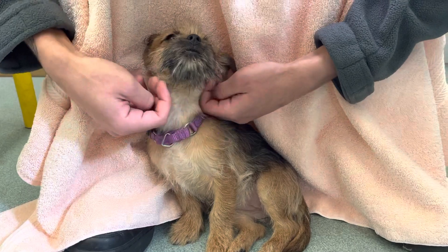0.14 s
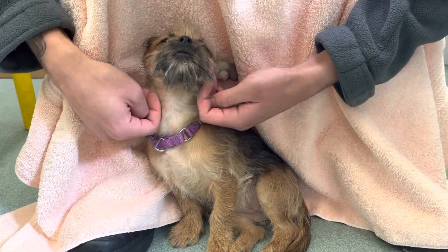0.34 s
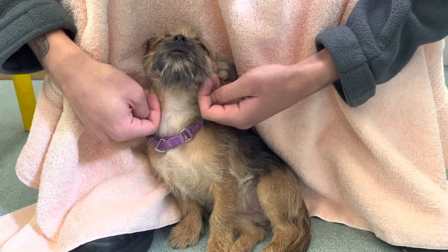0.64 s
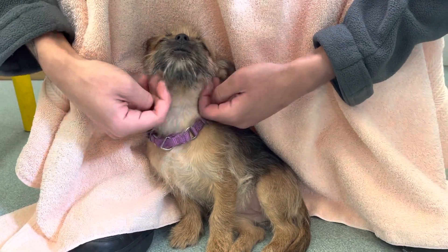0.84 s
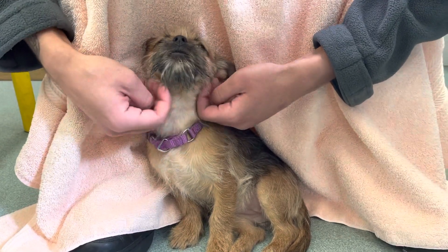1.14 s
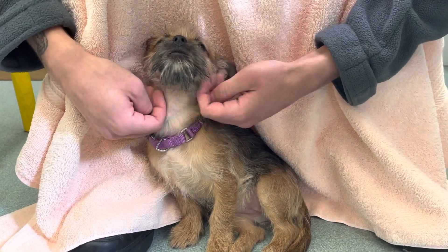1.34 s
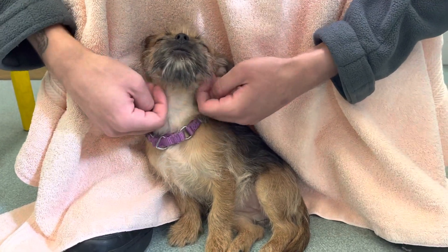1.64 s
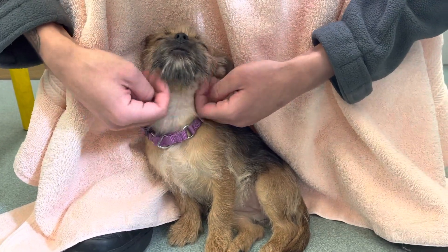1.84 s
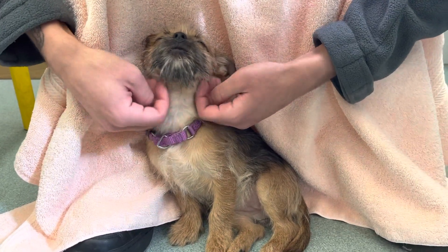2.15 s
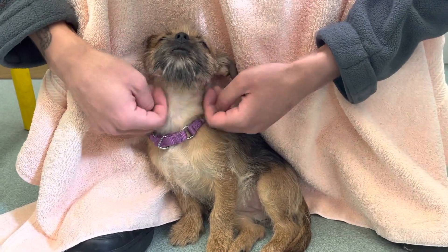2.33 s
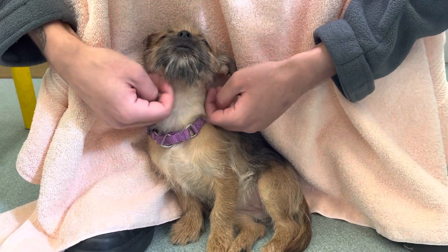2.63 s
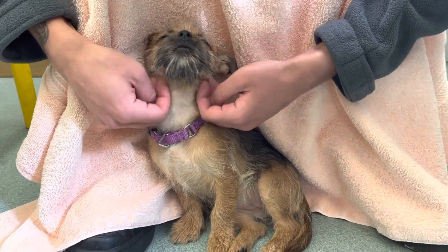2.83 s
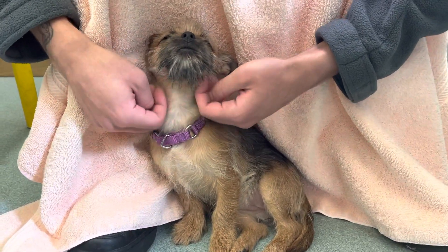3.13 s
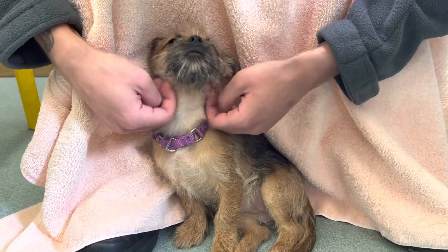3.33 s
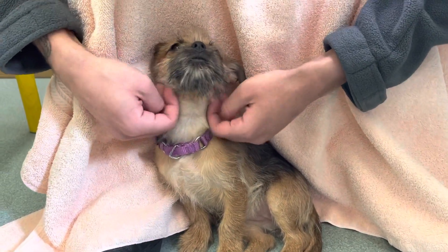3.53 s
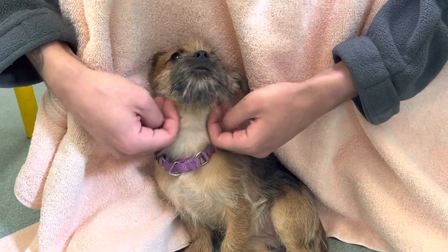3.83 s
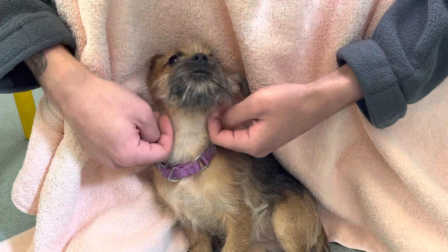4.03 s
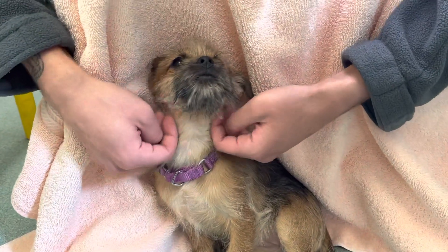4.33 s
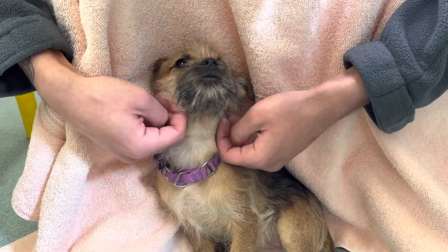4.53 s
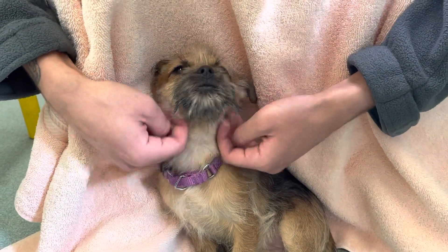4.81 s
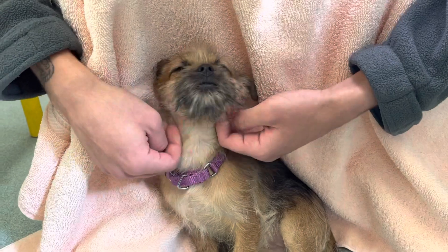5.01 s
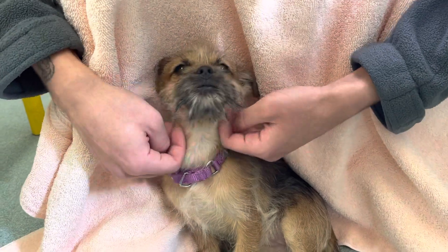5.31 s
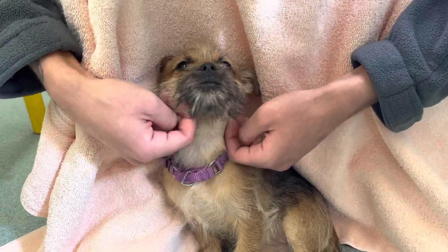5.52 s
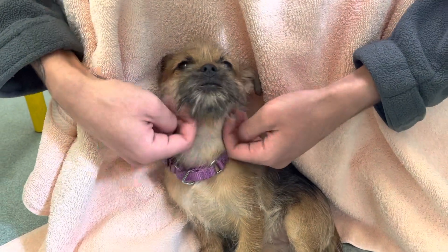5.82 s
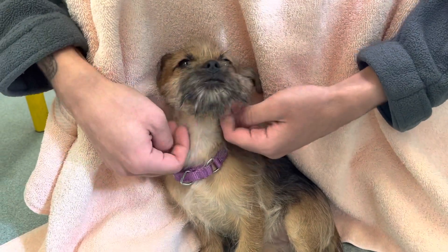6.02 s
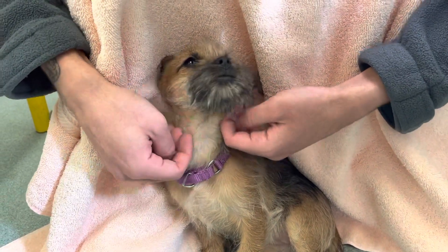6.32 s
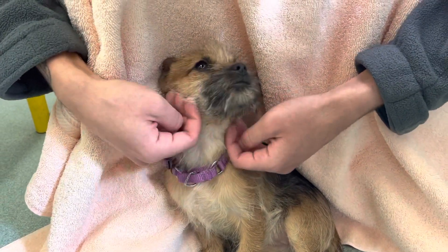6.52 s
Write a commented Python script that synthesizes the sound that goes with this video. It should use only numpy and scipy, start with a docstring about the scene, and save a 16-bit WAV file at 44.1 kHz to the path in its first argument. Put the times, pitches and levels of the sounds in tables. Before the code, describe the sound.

Indoors, a small puppy gives two short pitched yaps, the first already under way at the start. After a pause filled by a low fan hum and faint scratching of fingers in fur, a soft puff leads to three more yaps, then a pair. Small ticks sound between. The stereo microphones are close, with a short lively room echo.

```python
"""A small dog yaps seven times in three quick runs across a hard-walled room; the first yap has already begun.
Each yap sums vocal-fold partials, pulsed noise through resonances, and a whistle that modulates the partials.
A fan motor hums as wandering sine tones under the air noise, which is spectrally shaped random noise.
Close by, fingers scratch fur in swells of noise, among soft resonant puffs of air and small ringing ticks.
Two microphone ports listen: they differ in phase, balance and likeness by frequency."""
import sys
import numpy as np
from scipy import signal
from scipy.fft import rfft, irfft, next_fast_len
from scipy.io import wavfile
from scipy.ndimage import uniform_filter1d

SR = 44100
rng = np.random.default_rng(int(sys.argv[2]) if len(sys.argv) > 2 else 0)


def dump_mix(stems):
    """Bounce the given channels to the path in sys.argv[1] as a 16-bit WAV at rate SR."""
    frames = np.atleast_2d(stems).T  # one column per channel
    limited = np.clip(frames, -1, 1)  # hard clip at full scale
    pcm = np.round(limited * 32767).astype(np.int16)
    wavfile.write(sys.argv[1], SR, pcm)


N = 293697  # samples


def amp(db):
    """Logarithmic level: 20 dB is a factor of ten in amplitude."""
    return 10 ** (np.asarray(db) / 20)


def evened(x):
    """Power normalization: scales a signal to rms 1."""
    return x / np.sqrt(np.mean(x ** 2) + 1e-20)


def smoothed(x, size):
    """Low-pass filtering by two moving averages in a row."""
    return uniform_filter1d(uniform_filter1d(x, size=size), size=size)


def read(points, hz):
    """Logarithmic frequency scale: interpolates a table of (frequency, value)."""
    f, value = np.transpose(points)
    return np.interp(np.log(hz + 1), np.log(f + 1), value)


def add(mix, s, sound):
    """Superposition: adds a sound to the mix from a time in seconds."""
    part = mix[round(s * SR):][:len(sound)]
    part += sound[:len(part)]


def peak(t, at, rise, fall):
    """Exponential growth and decay: decibels climb linearly to 0 at a moment, then drop (rates in dB/s)."""
    return -np.maximum(rise * (at - t), fall * (t - at))


def resonate(x, hz, width):
    """Damped resonance: one complex pole, whose radius sets the bandwidth, with gain 1."""
    pole = np.exp((2j * np.pi * hz - np.pi * width) / SR)
    return 2 * signal.lfilter([1 - abs(pole)], [1, -pole], x).real


def ring(x, modes):
    """Modal superposition: parallel resonances, each passed twice for steep skirts and set to its level."""
    total = 0
    for hz, width, db in modes:
        twice = resonate(resonate(x, hz, width), hz, width)
        total = total + amp(db) * evened(twice)
    return total


def coloured(points, count):
    """Spectral shaping: independent white noises weighted by a spectrum, overall rms 1."""
    size = next_fast_len(N)
    weight = amp(read(points, np.fft.rfftfreq(size, 1 / SR)))
    spectrum = rfft(rng.standard_normal((count, size))) * weight
    return evened(irfft(spectrum, size)[:, :N])


# vocal-tract weighting of the third partial and above: pitch_hz [Hz], level_db [relative dB]
THROAT_SPECTRUM = [(2250, 4), (3000, -19.5), (3780, -16), (4500, -27.5), (6000, -14.5), (7480, -10),
                   (8680, -24), (9920, -42.5), (12000, -23), (14000, -49)]
# resonances rung by the rasp, low, high and treble: pitch_hz [Hz], width_hz [Hz], level_db [relative dB]
LOW_RASP_MODES = [(1125, 240, -1), (1305, 226, 4.5), (1344, 62, -15), (1400, 200, -26)]
HIGH_RASP_MODES = [(1993, 110, 13), (2576, 130, 5.5), (3210, 100, -10.5)]
TREBLE_RASP_MODES = [(3430, 200, -8.5), (5200, 2700, -5), (6760, 3900, -14), (8300, 940, -2.5),
                     (12900, 1000, -9.5)]
# resonances of the opening puff: pitch_hz [Hz], width_hz [Hz], level_db [relative dB]
OPENING_MODES = [(1700, 220, 3), (2100, 470, -12.5), (2630, 180, -8)]
# fundamental: climb before the folds catch, swell up to the crest, fade after it
CATCH_DB_PER_S, SWELL_DB_PER_S, FADE_DB_PER_S = 898.5, 104, 241
# second and upper partials, about the moment the mouth is widest
SECOND_RISE_DB_PER_S, SECOND_FALL_DB_PER_S = 80, 167.5
OPEN_DB_PER_S, SHUT_DB_PER_S = 320, 330
# the rasp peaks early, at RASP_S
RASP_S, RASP_RISE_DB_PER_S, LOW_FALL_DB_PER_S, HIGH_FALL_DB_PER_S = 0.035, 398, 108.5, 178.5
WHISTLE_HZ, WHISTLE_RISE_DB_PER_S, WHISTLE_FALL_DB_PER_S = 919.3, 452.5, 446.5
# pitch tops out TOP_S after the folds catch, then settles lower
TOP_S, CLIMB_HZ_PER_S, SETTLE_S = .025, 1400, .04
# steady folds close sharply and are bright on top, unsteady ones dull
BRIGHT_DB, DULL_DB_PER_SHARE, DULL_FROM_HZ = 13, 1301, 3300


def yap(start, catch, whistle_s, wide, crest, length, top_hz, drop, wobble,
        first_db, second_db, third_db, low_db, high_db, whistle_db, burst_db):
    """Source-filter voice: folds give partials and pulsed rasp; a whistle at another pitch adds sidebands."""
    t = np.arange(max(-start, 0), length, 1 / SR)  # a negative start skips the yap's beginning

    # level of each part over time
    uncaught = peak(t, catch, CATCH_DB_PER_S, 0)
    first_db = first_db + uncaught + peak(t, crest, SWELL_DB_PER_S, FADE_DB_PER_S)
    second_db = second_db + 0.31 * uncaught + peak(t, wide, SECOND_RISE_DB_PER_S, SECOND_FALL_DB_PER_S)
    third_db = third_db + uncaught + peak(t, wide, OPEN_DB_PER_S, SHUT_DB_PER_S)
    low_db = low_db + peak(t, RASP_S, RASP_RISE_DB_PER_S, LOW_FALL_DB_PER_S)
    high_db = high_db + peak(t, RASP_S, RASP_RISE_DB_PER_S, HIGH_FALL_DB_PER_S)
    whistle_db = whistle_db + peak(t, whistle_s, WHISTLE_RISE_DB_PER_S, WHISTLE_FALL_DB_PER_S)

    # pitches, integrated into turns (cycles elapsed)
    late = t - catch - TOP_S
    settling = drop * (np.exp(-(late / SETTLE_S) ** 2) - 1)
    hz = top_hz + np.where(late < 0, CLIMB_HZ_PER_S * late, settling)
    jitter, breath, drift, shimmer_noise = rng.standard_normal((4, SR // 2))[:, :len(t)]
    turns = np.cumsum(hz * (1 + wobble * evened(smoothed(jitter, 250)))) / SR
    whistle_turns = np.cumsum(WHISTLE_HZ * (1 + .014 * evened(smoothed(drift, 400)))) / SR

    bright_db = BRIGHT_DB - DULL_DB_PER_SHARE * wobble
    upper = 0
    for k in range(3, 19):
        throat_db = read(THROAT_SPECTRUM, k * hz) + bright_db * (k * top_hz > DULL_FROM_HZ)
        upper = upper + amp(throat_db) * np.sin(2 * np.pi * k * turns)
    overtones = amp(second_db) * np.sin(2 * np.pi * 2 * turns) + amp(third_db) * upper
    # the whistle shakes the folds at the difference of the two pitches: sidebands beside each overtone
    depth = np.clip(0.55 * amp(whistle_db - first_db), 0, 1.5)
    overtones = overtones * (1 + depth * np.cos(2 * np.pi * (whistle_turns - turns)))

    # breath noise pulses once a fold cycle
    pulses = (1.2 + np.exp(-(turns % 1) / 0.51)) * breath
    # unsteady folds blur the fundamental, mostly downwards
    first = np.sqrt(2) * np.sin(2 * np.pi * turns) + 12 * wobble * ring(pulses, [(670, 110, 0)])
    rasp = amp(low_db) * ring(pulses, LOW_RASP_MODES) + amp(high_db) * ring(pulses, HIGH_RASP_MODES)
    # treble hiss blooms only once the folds vibrate fully
    hiss_db = 0.58 * third_db + 0.29 * high_db + 0.45 * bright_db - 14.5
    hiss = amp(hiss_db) * ring(pulses, TREBLE_RASP_MODES)
    burst = amp(burst_db) * np.exp(-((t - .022) / 0.0083) ** 2) * ring(breath, OPENING_MODES)
    whistle = amp(whistle_db) * np.sqrt(2) * np.sin(2 * np.pi * whistle_turns)

    # random amplitude modulation at 18-55 Hz broadens every partial
    shimmer_band = signal.butter(3, [18, 55], "bandpass", fs=SR, output="sos")
    shimmer = 1 + .45 * evened(signal.sosfilt(shimmer_band, shimmer_noise))
    clear = shimmer * (amp(first_db) * first + np.sqrt(2) * overtones)
    voice = clear + rasp + hiss + burst + whistle
    ends = np.clip(np.minimum(t / 0.0097, (length - t) / 0.016), 0, 1)
    return max(start, 0), voice * ends


# reverberation of the hard-walled room: pitch_hz [Hz], t60_s [s to fall 60 dB]
ROOM_DECAY = [(500, 0.28), (1300, 0.39), (3500, 0.33), (9000, 0.29)]


def room(x, direct_db, rise_s):
    """Diffuse reverberation: a direct path, then dense random-sign echoes that build up and die by band."""
    taps = np.zeros((2, SR))
    at = np.arange(100, SR - 20, 20) + rng.integers(0, 20, (2, (SR - 101) // 20))
    np.put_along_axis(taps, at, rng.choice([-1., 1.], at.shape), 1)
    hz, t, bands = signal.stft(taps, SR, nperseg=128)
    decay = amp(-60 * t / read(ROOM_DECAY, hz)[:, None])
    tail = signal.istft(bands * decay, SR, nperseg=128)[1][:, :SR]
    tail = tail * (1 - np.exp(-np.arange(SR) / SR / rise_s))
    tail = tail / np.linalg.norm(tail, axis=1, keepdims=True)
    tail[:, 0] = [amp(direct_db), 0]  # the direct sound enters the first view only
    # the echo spectrum is divided by its smoothed magnitude, evening out the bands
    spectrum = rfft(tail)
    power = uniform_filter1d(abs(spectrum) ** 2, size=50, axis=1)
    power = uniform_filter1d(power, size=50, axis=1)
    response = irfft(spectrum / np.sqrt(power), SR)[:, :SR // 2]
    return signal.fftconvolve(x[None], response, axes=1)[:, :N]


# one row a yap: start_s [s], then seconds after it: catch_s, whistle_peak_s, mouth_widest_s, crest_s, end_s [s];
# top_pitch_hz [Hz], drop_to_settled_hz [Hz], unsteadiness [rms share of pitch];
# level settings before the room [dB]: fundamental_db, second_db, third_and_above_db, low_rasp_db,
# high_rasp_db, whistle_db, opening_puff_db
YAP_ROWS = [(-.02, 0.031, 0.065, 0.074, 0.12, 0.15, 761.2, 36.7, 0.014, -12.5, -29.5, -28.5, -26, -47, -15.5, -64),
            (.315, .04, 0.07, 0.087, 0.12, 0.2, 748.6, 28.3, 0.017, -16, -39, -29, -27, -47, -14.5, -38),
            (2.65, .058, 0.1, 0.098, 0.13, 0.17, 778.7, 40, 0.0083, -14.5, -21.5, -23, -36, -49, -47.5, -39.5),
            (3.0, 0.034, 0.074, 0.078, 0.13, .19, 774.8, 16, 0.014, -13, -26, -27, -29, -48, -19.5, -40),
            (3.335, .04, 0.072, 0.089, 0.12, 0.1656, 766.4, 24, 0.016, -17, -46, -27.5, -29, -49.5, -19.5, -43.5),
            (4.38, .062, 0.079, 0.11, 0.14, .22, 768.6, 41.3, .009, -22, -28, -32, -35, -44.5, -29.5, -32),
            (4.744, 0.042, 0.04, 0.094, 0.11, 0.16, 760.8, 28.8, 0.011, -17, -25, -24.5, -34.5, -51, -25.5, -39.5)]


def dog():
    """Position-dependent room response: each yap, from a slightly different spot, meets its own echoes."""
    out = np.zeros((2, N))
    for row in YAP_ROWS:
        voice = np.zeros(N)
        add(voice, *yap(*row))
        out += room(voice, direct_db=-5, rise_s=.003)
    return out


# spectrum of the air noise: pitch_hz [Hz], level_db [relative dB per Hz]
AIR_SPECTRUM = [(18, -15), (40, -4.5), (65, 6), (100, 1), (160, -2), (300, -15), (450, -13), (724, -15.5),
                (1600, -20.5), (3300, -34), (4540, -42.5), (5970, -45.5), (7650, -47.5), (9520, -61),
                (11500, -49), (14000, -60)]


def air():
    """Broadband stationary noise: two independent views at an rms of -52 dB before the ports."""
    return amp(-52) * coloured(AIR_SPECTRUM, count=2)


# motor tones: pitch_hz [Hz], level_db [dB rms, midway between the ports], width_hz [Hz rms], pan_db [left - right dB]
MOTOR_TONES = [(119.9, -50, 0.66, 8), (395, -67.5, 7.53, 1), (540, -79, 8.7, 4), (1130, -79.5, 9.8, -4.5),
               (1440, -81, 2.7, -5)]


def hum():
    """Frequency modulation: each motor tone wanders randomly about its pitch and reaches the ports directly."""
    out = np.zeros((2, N))
    for hz, db, width, pan_db in MOTOR_TONES:
        wander = evened(uniform_filter1d(rng.standard_normal(N), size=4000))
        tone = np.sqrt(2) * np.sin(2 * np.pi * np.cumsum(hz + width * wander) / SR)
        out += amp(db + pan_db * np.array([[.5], [-.5]])) * tone
    return out


# soft puffs of air: start_s [s], length_s [s], level_db [dB before the room],
# resonances as (pitch_hz [Hz], width_hz [Hz], level_db [relative dB])
AIR_PUFFS = [(2.42, 0.12, -59.5, [(1770, 200, 5), (2300, 970, 2), (2900, 500, 0), (3693, 2800, -4.5),
             (4800, 1200, -10.5), (7500, 4300, -20)]), (0.67, 0.13, -77, [(5490, 450, 5), (4900, 530, -2)]),
             (.93, .1, -73, [(2000, 1000, 6), (4500, 1500, -8)]), (1.17, 0.13, -72, [(2100, 700, 7),
             (4500, 1500, -6)])]


def puffs():
    """Resonant filtering of turbulence: noise rings a few modes under a rounded swell."""
    out = np.zeros(N)
    for s, length, db, modes in AIR_PUFFS:
        size = round(length * SR)
        swell = np.sin(np.pi * np.linspace(0, 1, size) ** 0.91) ** 1.4
        add(out, s, amp(db) * ring(rng.standard_normal(size), modes) * swell)
    return out


# runs of finger strokes: first_s [s], last_s [s], interval_s [s between strokes], level_db [stroke gain in dB]
STROKE_RUNS = [(0.77, 2.56, 0.2, -80.5), (3.881, 4.21, 0.15, -76), (5.162, 6.5, .1625, -75)]
# spectrum of fur friction: pitch_hz [Hz], level_db [relative dB]
FUR_SPECTRUM = [(1500, -39), (3500, 2), (6000, 7), (7500, 5.5), (9000, -8), (10000, -18), (12000, 3),
                (14000, 1)]
STROKE_S = 0.03  # from a stroke's crest to 1/e of its amplitude


def scratching():
    """Friction noise under amplitude modulation: each stroke is a bell-shaped swell."""
    t, strokes = np.arange(N) / SR, np.zeros(N)
    for first, last, every, db in STROKE_RUNS:
        for s in np.arange(first, last, every):
            strokes += amp(db) * np.exp(-((t - s) / STROKE_S) ** 2)
    return strokes * coloured(FUR_SPECTRUM, count=2)


# small ticks: start_s [s], level_db [peak dB before the room], pitch_hz [Hz], width_hz [Hz]
TICK_ROWS = [(1.426, -51, 3160, 2500), (1.445, -61, 4300, 1800), (1.446, -47.5, 2180, 500),
             (1.543, -67, 6100, 1500), (3.589, -40, 7400, 7000), (3.595, -45, 12600, 5970),
             (3.609, -65, 11800, 4067), (3.88, -60, 5850, 2000)]


def ticks():
    """Impulsive excitation: a fast-dying burst of noise rings one resonance."""
    out = np.zeros(N)
    for s, db, hz, width in TICK_ROWS:
        impulse = rng.standard_normal(800) * np.exp(-np.arange(800) / 70)
        snap = ring(impulse, [(hz, width, 0)])
        add(out, s, amp(db) * snap / abs(snap).max())
    return out


def close_sounds():
    """Near field: the direct path is strong for puffs and ticks; the strokes have no echoes."""
    return room(puffs() + ticks(), direct_db=5, rise_s=.004) + scratching()


# likeness of the two ports: pitch_hz [Hz], likeness [0 to 1]
PORT_LIKENESS = [(20, .99), (180, .97), (350, .8), (700, .3), (1400, .6), (2800, .6), (5600, .75),
                 (10000, .85), (13000, .98)]
# phase between the ports: pitch_hz [Hz], lead_rad [radians the left leads]
PORT_LEAD = [(1000, -1.6), (1500, -2.0), (2300, -4.3), (3270, -6.2), (5080, -7.2), (7300, -11.5),
             (8600, -11.0), (11500, -7.2), (14000, -7.0)]
# balance of the ports: pitch_hz [Hz], balance_db [left - right dB]
PORT_BALANCE = [(30, 1), (110, 3.5), (250, .5), (400, -1), (700, .5), (1400, 2.6), (2300, 4.8), (4000, 1),
                (8000, .4), (13000, 0)]


def ports(field):
    """Interaural-style coherence: two unrelated views become ports with set likeness, lead and balance."""
    size = next_fast_len(N + 2000)
    hz = np.fft.rfftfreq(size, 1 / SR)
    a, b = rfft(field, size)
    alike = np.clip(read(PORT_LIKENESS, hz), 0, 1)
    tilt = amp(read(PORT_BALANCE, hz) / 2)
    lead = np.interp(hz, *np.transpose([(0.0024, 0.042)] + PORT_LEAD))
    left = a * tilt * np.exp(1j * lead)
    right = (alike * a + np.sqrt(1 - alike ** 2) * b) / tilt
    return irfft(np.array([left, right]), size)[:, :N]


def scene():
    """Linear superposition: dog, air and close sounds pass through the ports; the hum is added directly."""
    return ports(dog() + air() + close_sounds()) + hum()


def record(dry):
    """Band limiting: a band-stop thins the sound from 9.1 to 10.9 kHz, and a steep low-pass cuts at 14150 Hz."""
    notch = signal.butter(3, [9100, 10900], "bandstop", fs=SR, output="sos")
    low_pass = signal.firwin(511, 14150, window=("kaiser", 9), fs=SR)
    return signal.oaconvolve(signal.sosfilt(notch, dry), low_pass[None], "same")


dry = scene()
out = record(dry)
dump_mix(out)
```